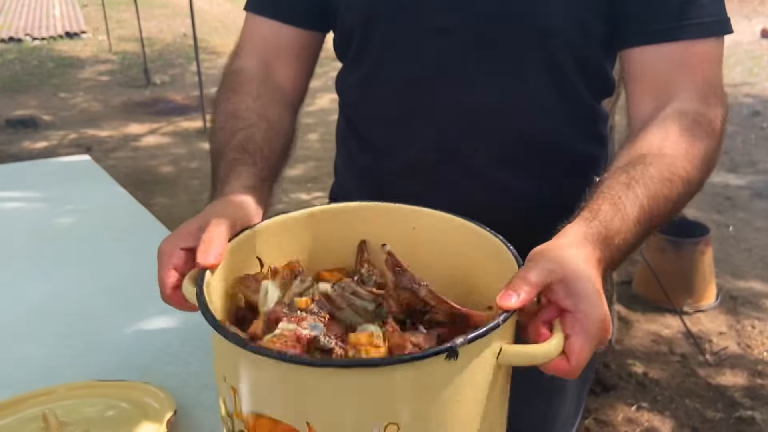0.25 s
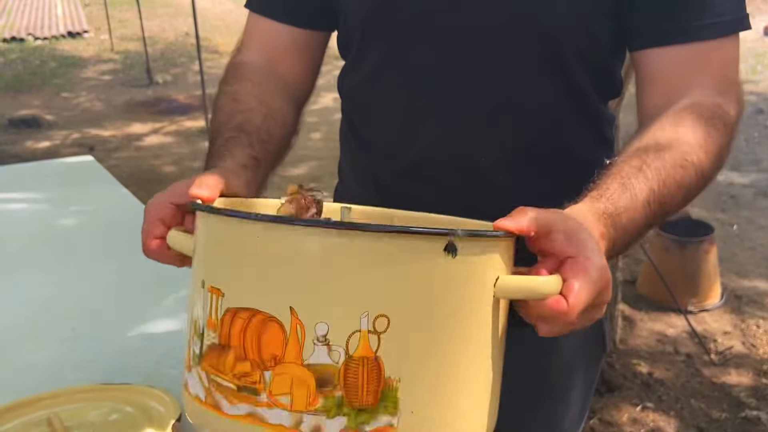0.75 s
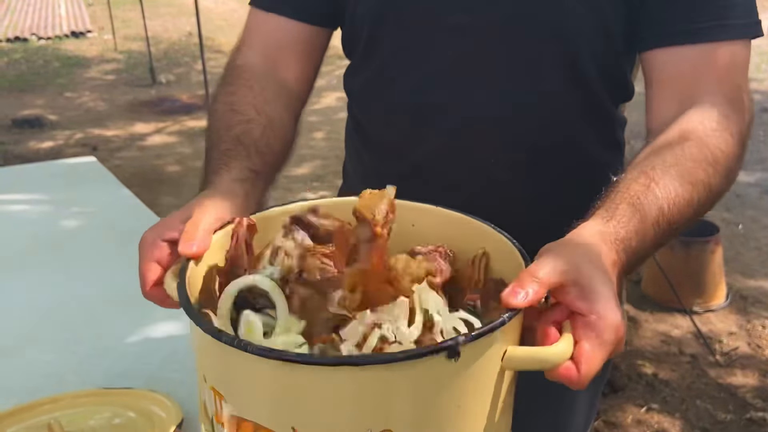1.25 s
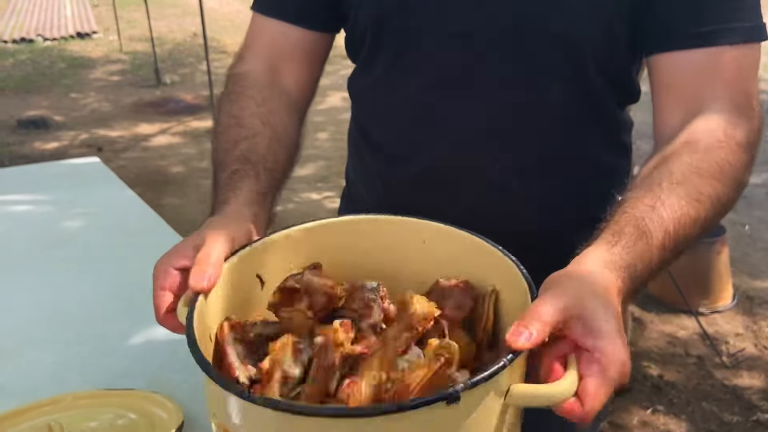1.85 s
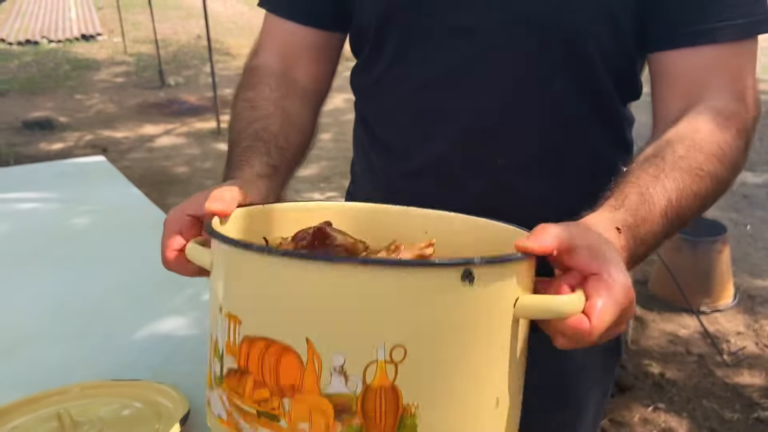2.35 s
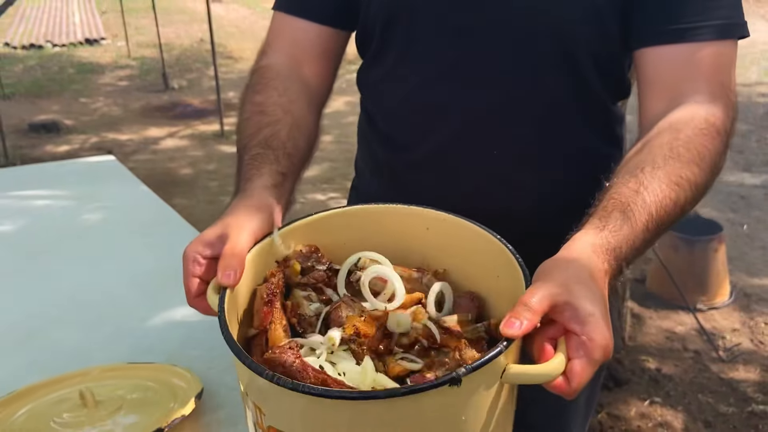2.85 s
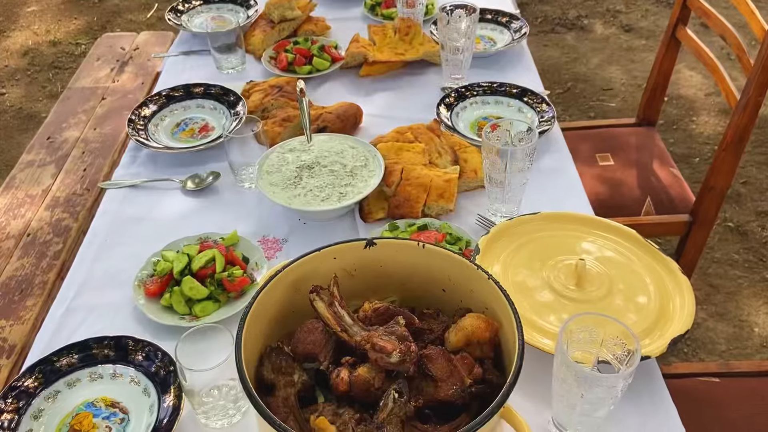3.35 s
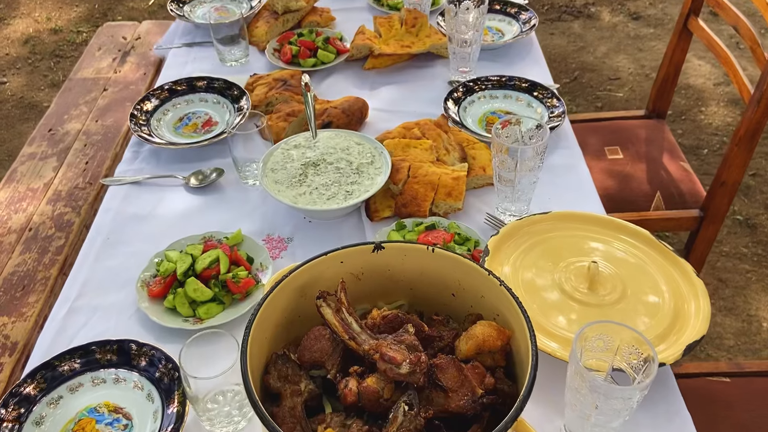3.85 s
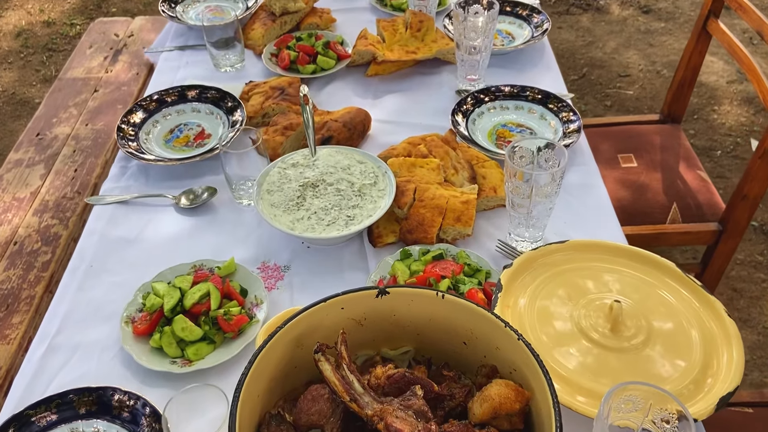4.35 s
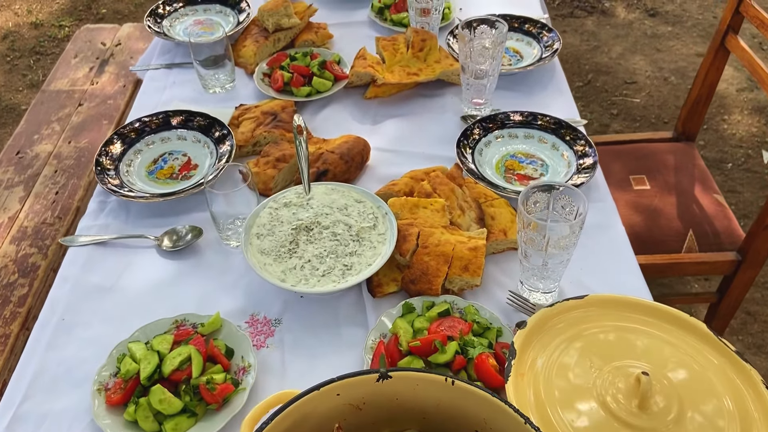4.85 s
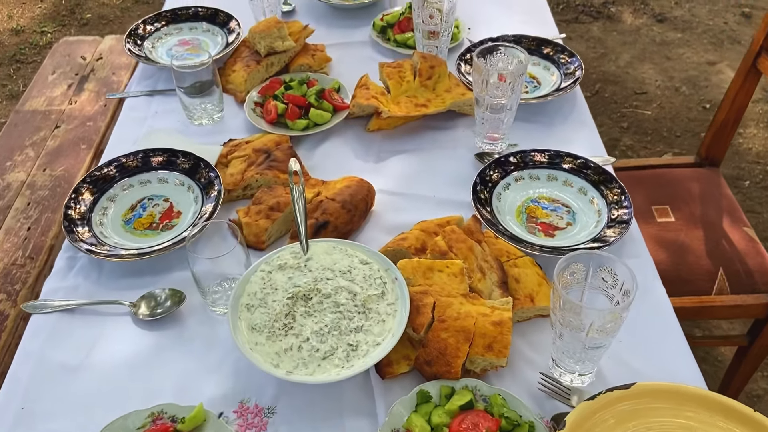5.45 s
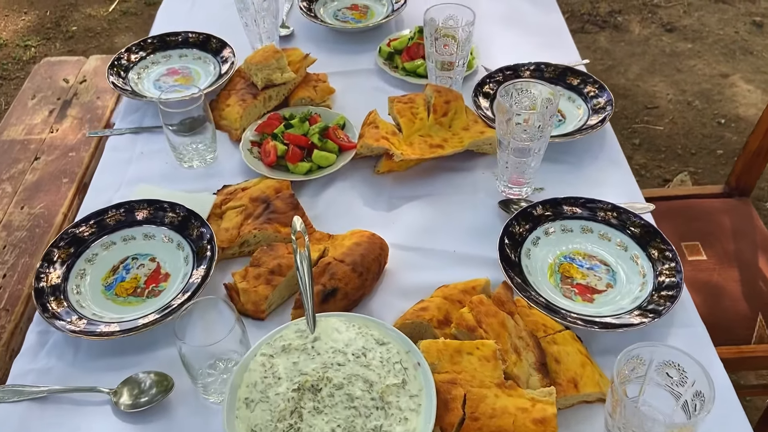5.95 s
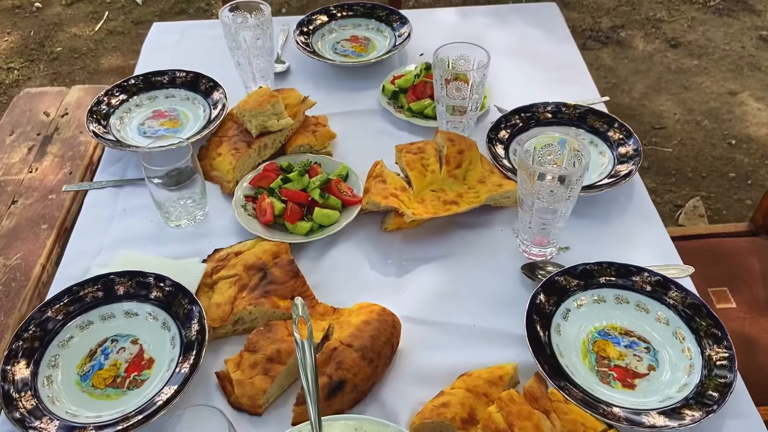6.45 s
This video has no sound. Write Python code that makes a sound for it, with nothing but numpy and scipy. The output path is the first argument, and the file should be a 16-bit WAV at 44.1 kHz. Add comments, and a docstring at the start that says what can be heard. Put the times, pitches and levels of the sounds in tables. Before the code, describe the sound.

From 0 to 3.16 s, close up, meat and onions are tossed in an enamel pot. Landings come at about 0.05, 0.5, 0.9, 1.3, 1.8, 2.15 and 2.6 s, the last loudest: soft heavy thuds, wet smacks, small pops and a damped hollow ring, with squelchy sliding around each. After 2.8 s it settles to near quiet, with small clicks. At 3.16 s it cuts hard to a quiet yard with a low bump on the microphone. A hen some way off clucks at 3.25 and 3.4 s, then gives a raspy, leaping squawk from 3.5 to 3.8 s. Dry clucks follow roughly every 0.2 s from 4.4 to 5.85 s, with fainter hens calling near 5.0 and 5.5 s, then another squawk at 5.95-6.2 s. Soft bumps, dirt scuffs, rustles, faint hiss and light wind puffs run beneath. A wild bird gives a clear rising whistle at 6.3 s and a warbled one at 6.65 s.

```python
"""Raw meat and onions thud and slap in an enamel pot close to the microphone in a yard, and ring its hollow.
The scene then changes abruptly to a quiet outdoor table: some way off a hen clucks and breaks into squawks,
a wild bird whistles, and soft bumps, scuffs, rustles and a little wind reach the microphone.
Blows and sprays of clicks excite the pot's resonances; pulses and air pass through the hen's throat;
the whistles are gliding tones, and the air, hiss and wind are coloured noise."""
import sys
import numpy as np
from scipy import signal
from scipy.fft import rfft, irfft, next_fast_len
from scipy.io import wavfile
from scipy.ndimage import uniform_filter1d

SR = 44100
rng = np.random.default_rng(int(sys.argv[2]) if len(sys.argv) > 2 else 0)


def wrap_up_sound(samples):
    """Save the sound to the file named by the first command line argument, as 16-bit audio."""
    columns = np.atleast_2d(samples).T
    # keep every value between -1 and 1, then stretch to whole-number steps
    tamed = np.clip(columns, -1, 1)
    steps = np.round(tamed * 32767).astype(np.int16)
    wavfile.write(sys.argv[1], SR, steps)


N = 295911
T = np.arange(N) / SR
HIT_T = T[:8192]  # time axis of one short sound
PORTS = np.array([[1], [-1]]) / 2  # left and right, half of any difference each


def amp(db):
    """Decibels to gain."""
    return 10 ** (np.asarray(db) / 20)


def unit(x):
    """Scale to rms 1."""
    return x / np.sqrt(np.mean(x ** 2))


def peak_unit(x, size=176):
    """Scale so that the loudest stretch of size samples has rms 1."""
    return x / np.sqrt(uniform_filter1d(np.atleast_2d(x) ** 2, size).mean(axis=0).max())


def add(out, s, x):
    """Mix x into out from time s on."""
    i = max(int(s * SR), 0)
    out[..., i:i + x.shape[-1]] += x[..., :max(N - i, 0)]


def at(points, f):
    """Read (Hz, value) points on a log-frequency axis."""
    hz, value = np.transpose(points)
    return np.interp(np.log(f + 1), np.log(hz), value)


def shape(x, response):
    """Filter by a gain given as a function of frequency."""
    n = next_fast_len(x.shape[-1] + 2048)
    return irfft(rfft(x, n) * response(np.fft.rfftfreq(n, 1 / SR)), n)[..., :x.shape[-1]]


def colour(x, points):
    """Filter by (Hz, dB) points."""
    return shape(x, lambda f: amp(at(points, f)))


def resonance(f, hz, width):
    """Response of one resonance, 1 at its centre."""
    return 1j * f * width / (hz ** 2 - f ** 2 + 1j * f * width)


def moving_band(x, hz, width, order=2):
    """A resonance whose centre may move: shift it down to 0 Hz, low-pass, shift back."""
    turn = np.exp(2j * np.pi * np.cumsum(hz * np.ones(len(x))) / SR)
    return 2 * np.real(turn * butter(x / turn, width / 2, "low", order=order))


def butter(x, hz, kind, order=2):
    """Causal low- or high-pass."""
    return signal.sosfilt(signal.butter(order, min(hz, SR / 2 - 1), kind, fs=SR, output="sos"), x)


def walk(rate, n=N):
    """Random wandering of spread near 1, with a new target rate times a second."""
    return np.interp(T[:n] * rate, np.arange(n), rng.standard_normal(n))


def bell(t, width):
    """A smooth swell, 1 at t = 0."""
    return np.exp(-(t / width) ** 2 / 2)


def widen(mid, side, side_db):
    """Left and right from a common and an opposed part."""
    return mid + amp(side_db) * side * np.array([[1], [-1]])


def crackle(n, rate, spread_db):
    """Random clicks of very unequal size, such as bursting films and bubbles of juice, or grit."""
    size = amp(spread_db * np.minimum(rng.exponential(size=n), 4))
    return (rng.random(n) < rate / SR) * size * rng.standard_normal(n)


# The close pot as the two microphone ports hear it.
# Each row: frequency in Hz, left minus right in dB.
PORT_BALANCE = [(60, -5), (110, 4.5), (200, -2), (380, -4.5), (700, -6), (1290, 0.5), (2380, 0.5),
                (4400, 2), (8120, -0.5), (15000, 0.5)]


def pot(lag_s=.000034):
    """All the sounds of the tossing; they reach the left port a moment before the right."""
    near = thuds() + slaps() + clicks() + slide()
    return shape(near, lambda f: amp(PORTS * at(PORT_BALANCE, f)) * np.exp(2j * np.pi * PORTS * f * lag_s))


# Heavy pieces landing in the pot.
# Each row: start in seconds, level in dB, hardness (top of the ring) in Hz, damping as a factor on mode widths.
THUDS = [(.014, -28, 856, 0.53), (.045, -37, 730, 0.28), (.45, -26, 886, 0.36), (.475, -18, 720, 0.84),
         (.53, -46.5, 650, 0.55), (.728, -51.5, 640, 0.32), (.882, -15, 744, 1), (.905, -33.5, 800, 0.76),
         (.932, -36.5, 630, 1.1), (1.263, -37.5, 1090, 0.11), (1.316, -31, 790, 0.39),
         (1.325, -38, 630, 0.64), (1.396, -40.5, 680, 1.2), (1.423, -34.5, 970, 1.5),
         (1.481, -35.5, 1030, 1.2), (1.769, -23, 946, 0.91), (1.981, -44.5, 1110, 0.23),
         (2.096, -34, 950, 0.37), (2.287, -38, 750, 0.75), (2.405, -53, 644, 0.29),
         (2.44, -46.5, 636, 0.18), (2.586, -8, 956, 0.66), (2.594, -18, 910, 1.06),
         (2.633, -13.5, 915, 1.6), (2.711, -44.5, 714, 0.81)]
FLESH_RATIO = .8  # the note of the flesh itself, as a share of a blow's hardness


def thuds(flesh_s=0.00092, flesh_db=-1, low_hz=430, shove_hz=150, shove_db=-36):
    """Soft heavy pieces push the air in the pot; the meat that covers the bottom damps the ring."""
    out = np.zeros(N)
    # the whole pot jolts
    shove = np.exp(-HIT_T / 0.022) * np.sin(2 * np.pi * shove_hz * HIT_T)
    for (s, db, hard_hz, damping), size in zip(THUDS, rng.standard_normal(len(THUDS))):
        flesh_hz = FLESH_RATIO * hard_hz * (1 + .04 * size)
        flesh = HIT_T ** 2 * np.exp(-HIT_T / flesh_s) * np.sin(2 * np.pi * flesh_hz * HIT_T)
        ring = butter(pot_modes(damping, LOAD_SHIFT * size / 2, count=7), hard_hz, "low")
        blow = butter(peak_unit(ring) + amp(flesh_db) * peak_unit(flesh), low_hz, "high", order=5)
        add(out, s, amp(db) * (peak_unit(blow) + amp(shove_db) * shove))
    return out


# Wet slaps and smacks in the pot.
# Each row: start in seconds, level in dB, brightest frequency in Hz, decay time in seconds.
SLAPS = [(.013, -24, 5350, 0.02), (.094, -38.5, 4030, 0.027), (0.151, -45.5, 4220, 0.0093),
         (0.453, -38, 2880, 0.06), (0.48, -33, 4000, 0.015), (0.545, -43.5, 3300, 0.018),
         (0.577, -40.5, 4440, 0.021), (0.616, -39, 3460, 0.016), (.799, -39, 2410, 0.017),
         (.847, -26.5, 5700, 0.019), (.907, -34, 4230, 0.04), (0.952, -29, 5030, 0.0048),
         (1.219, -34, 4030, 0.016), (1.275, -37, 4260, 0.016), (1.316, -37, 6840, 0.015),
         (1.339, -22.5, 3130, 0.016), (1.564, -36, 3170, 0.031), (1.648, -39, 6100, 0.0093),
         (1.694, -41, 3870, 0.023), (1.709, -31.5, 6500, 0.023), (1.746, -26.5, 8200, 0.0038),
         (1.764, -27, 7200, 0.0041), (1.773, -17.5, 3430, 0.01), (1.981, -43.5, 2820, 0.0052),
         (2.094, -31, 5360, 0.0092), (2.121, -36, 3880, 0.03), (2.275, -39.5, 8630, 0.005),
         (2.467, -38, 3670, 0.023), (2.531, -38.5, 2480, 0.029), (2.566, -33, 5600, 0.035),
         (2.585, -17, 3140, 0.0099), (2.631, -30.5, 2013, 0.014), (2.685, -39.5, 6500, 0.015),
         (2.734, -40.5, 5100, 0.02), (2.787, -46, 2980, 0.0076), (2.801, -46.5, 2400, 0.0076),
         (3.142, -38.5, 3220, 0.0079)]


def slaps(contact_db=4, contact_s=.002):
    """Wet surfaces meet with a smack and a quickly fading spray of clicks, among them small popping notes."""
    out = np.zeros((2, N))
    for s, db, hz, decay in SLAPS:
        fading = np.exp(-HIT_T / decay) + amp(contact_db) * np.exp(-HIT_T / contact_s)
        spray = crackle(len(HIT_T), rate=7700, spread_db=2.0) * fading
        spray = peak_unit(shape(spray, lambda f: resonance(f, hz, 1.2 * hz)))
        # small pockets of air and juice pop, each with its own short rising note
        for delay, pitch, size in rng.random((7, 3)):
            age = np.maximum(HIT_T - 3 * decay * delay, 0)
            cycles = hz * (.4 + pitch) * age * (1 + 10 * np.minimum(age, .02))
            pop = np.exp(-2 * delay - cycles / 14) * np.sin(2 * np.pi * cycles)
            spray = spray + .9 * size * pop
        add(out, s, amp(db) * peak_unit(in_pot(spray)))
    return out


# Dry clicks among the pot sounds, some with a slap, the last at the scene cut.
# Each row: start in seconds, level in dB, brightest frequency in Hz.
CLICKS = [(.670, -44, 6000), (1.746, -21.5, 7050), (2.074, -45, 6000), (2.5847, -18, 3170),
          (2.927, -42, 6550), (3.158, -28, 1480)]


def clicks():
    """Each dry click is one impulse through a broad resonance."""
    out = np.zeros((2, N))
    for s, db, hz in CLICKS:
        click = shape(1. * (HIT_T == 0), lambda f: resonance(f, hz, 0.69 * hz))
        add(out, s, amp(db) * peak_unit(click))
    return out


def slide(rub_db=-9, heave_db=-16, juice_db=-8, juice_hz=1900, smack_db=-1, smack_s=0.012,
          patchy_db=3.0, rub_patchy_db=6, rub_damping=2.8, piece_hz=3500, count=5):
    """Pieces squelch in their own colours and murmur in the pot's first modes; the load heaves with a rumble."""
    wet = rub = 0
    for place in np.linspace(-1, 1, count):
        squelch = crackle(N, rate=900, spread_db=3.4) * amp(patchy_db * walk(35))
        # small smacks at random moments
        contacts = 1. * (rng.random(N) < 9 / SR)
        contacts = signal.lfilter([1], [1, -np.exp(-1 / (smack_s * SR))], contacts)
        squelch = squelch * (1 + amp(smack_db) * unit(contacts))
        hz = piece_hz * 2 ** place
        wet = wet + unit(in_pot(shape(squelch, lambda f: resonance(f, hz, 1.6 * hz))))
        drag = crackle(N, rate=60, spread_db=2) * amp(rub_patchy_db * walk(14))
        murmur = pot_modes(rub_damping, LOAD_SHIFT * place, count=2)
        rub = rub + unit(signal.fftconvolve(drag, murmur)[:N])
    heave = colour(rng.standard_normal(N), [(25, -18.0), (60, -7), (170, -3), (300, -7.5), (900, -52.5)])
    juice = crackle(N, rate=1200, spread_db=3.2) * amp(5 * walk(45))
    juice = in_pot(shape(juice, lambda f: resonance(f, juice_hz, juice_hz) ** 2))
    load = unit(wet) + amp(juice_db) * unit(juice) + amp(rub_db) * unit(rub) + amp(heave_db) * unit(heave)
    return load * sliding()


# Tosses, at the moment the load comes down.
# Each row: landing in seconds, level of the sliding meat in dB.
TOSSES = [(.04, -47.5), (0.492, -52.5), (0.891, -48.5), (1.319, -47.5), (1.78, -48), (2.151, -44),
          (2.63, -44.5)]
GATHER_S, SETTLE_S = 0.099, 0.099  # the sliding swells before a landing and dies away after it
SHIFT_DB, HELD_DB, HELD_S = -64.5, -65.5, 2.8  # the meat shifts between tosses, less once the pot is held still


def sliding():
    """How strongly the meat slides: it gathers before each landing, settles after it and rests at the end."""
    swells = sum(amp(db) * np.exp(-np.maximum((s - T) / GATHER_S, (T - s) / SETTLE_S)) for s, db in TOSSES)
    return np.where(T < HELD_S, np.hypot(swells, amp(SHIFT_DB)), amp(HELD_DB))


# Air and wall resonances of the pot.
# Each row: centre in Hz, width in Hz before damping, level in dB before weighting by width.
POT_RESONANCES = [(549, 45, 0), (807, 42, -9), (1240, 38, -12), (1650, 56, -16), (2060, 38, -21),
                  (2330, 100, -16), (2610, 110, -17), (3170, 130, -16), (3700, 59, -15), (4120, 170, -23),
                  (4620, 37, -20), (5300, 45, -21), (6000, 230, -22), (6470, 40, -22), (7150, 170, -25)]
AIR_MODES, LOAD_SHIFT = 4, .03  # the lowest modes are the pot's air: their shift scales with this share


def pot_modes(damping, shift=0, count=30):
    """The pot's ring after one push: the load shifts its air modes; neighbouring modes start opposed."""
    ring = 0
    for k, (hz, width, db) in enumerate(POT_RESONANCES[:count]):
        decay = np.exp(-np.pi * width * damping * HIT_T)
        mode_hz = hz * (1 + shift * (k < AIR_MODES))
        ring = ring + (-1) ** k * amp(db) * width * decay * np.sin(2 * np.pi * mode_hz * HIT_T)
    return ring


# Tone of the wet sounds.
# Each row: frequency in Hz, gain in dB.
WET_COLOUR = [(200, 2.5), (500, -3), (1000, 3), (2000, -0.5), (4000, -3.5), (7000, 0), (11000, -2),
              (16000, -7.5)]


def in_pot(x, scatter_db=0, scatter_s=0.007, direct=0.31, side_db=-3):
    """A wet sound inside the pot: heard directly, through the modes and scattered between the walls."""
    scatter = rng.standard_normal((2, len(HIT_T))) * np.exp(-HIT_T / scatter_s)
    modes = pot_modes(0.82, LOAD_SHIFT * rng.standard_normal())
    response = unit(modes) + amp(scatter_db) * unit(widen(*scatter, side_db))
    response = response / np.sqrt(len(HIT_T))
    response[:, 0] += direct
    return colour(signal.fftconvolve(x[None], response, axes=1)[:, :len(x)], WET_COLOUR)


CLUCK_ECHO_DB, SQUAWK_ECHO_DB, YARD_T60_S = -4, -4, .34  # echo levels and the yard's main decay


def hen():
    """Dry little clucks, long squawks and the calls of hens farther off, all carrying round the yard."""
    calls = squawks() + far_calls()
    return yard(clucks(), CLUCK_ECHO_DB, YARD_T60_S) + yard(calls, SQUAWK_ECHO_DB, YARD_T60_S)


# A squawk opens with a rasp, leaps to a held note and falls back into a rasping tail; one curve for each.
# Each row: time in seconds, level in dB, pitch in Hz, roughness 0-1, upper resonance in Hz and its level in dB,
# beak opening in dB, level of the second tone in dB.
SQUAWKS = [
    [(3.498, -60, 608.6, 0.93, 2800, -6, 10, -80), (3.528, -40, 606.3, 0.9, 2920, -3.5, 4, -59),
     (3.56, -43.5, 579.7, 0.73, 2750, -9, -2, -33), (3.592, -45, 584.3, 0.54, 2670, -7, 2.5, -36),
     (3.607, -42.5, 672.6, 0.12, 2900, -17, -2, -39.5), (3.745, -46.5, 662, 0.07, 3090, -12, -2.5, -56),
     (3.768, -44.5, 626.5, 0.82, 2850, -6.5, -1.5, -58), (3.805, -46, 542, 0.69, 2630, -11, -2.5, -44),
     (3.835, -64, 530, .8, 2600, -12, 0, -70)],
    [(5.932, -68, 624.6, 0.64, 3860, -14, -4, -70), (5.955, -48, 600.7, .7, 3740, -8, 3, -53),
     (5.99, -52, 570.4, 0.43, 3450, -6, 6, -38), (6.022, -45.5, 642, 0.78, 2744, -4.5, 4, -60),
     (6.08, -46.5, 670.6, 0.38, 2890, -9, 6, -56), (6.168, -44.5, 630.6, 0.68, 2686, -3, 7, -60),
     (6.225, -59, 582.4, 0.92, 2700, -3, -2, -77)],
]
MOUTH_HZ = 1246  # the throat's main resonance in a squawk
SECOND_TOP_HZ = 1168  # the syrinx's other side sings at twice the pitch, but no higher than this


def squawks():
    """The hen's long calls, each along its own curve."""
    out = np.zeros(N)
    for curve in SQUAWKS:
        add(out, curve[0][0], squawk(curve))
    return out


def squawk(curve):
    """One long call: both sides of the syrinx follow the hen's effort."""
    times, *columns = np.transpose(curve)
    t = np.arange(times[0], times[-1], 1 / SR)
    db, hz, rough, upper_hz, upper_db, beak_db, second_db = (np.interp(t, times, c) for c in columns)
    voice = hen_voice(hz, rough, MOUTH_HZ, upper_hz, upper_db, beak_db)
    second = tone(np.minimum(2 * hz, SECOND_TOP_HZ), waver=0.0051, overtone_db=-36.0)
    return amp(db) * voice + amp(second_db) * second


# The throat's lesser resonances, let out by the open beak.
# Each row: centre in Hz, width in Hz, level in dB.
THROAT = [(2070, 670, -11.5), (4070, 650, -15.5), (4680, 570, -23.5), (6330, 1130, -23),
          (7500, 1270, -23.5), (11050, 2600, -22.5)]
MOUTH_WIDTH_HZ, UPPER_WIDTH_HZ = 380, 685  # the main resonance and the moving upper one
HALF_PITCH = 0.78  # share of the half pitch per unit of roughness
SQUAWK_LOW_HZ = 890  # the throat passes little below this


def hen_voice(hz, rough, mouth_hz, upper_hz, upper_db, beak_db, jitter=0.05, count=40):
    """Uneven syrinx pulses, alternately strong and weak, pass the throat with rasping air; levelled near rms 1."""
    n, half = len(hz), np.minimum(HALF_PITCH * rough, 1)
    # a hoarse voice also wanders more in pitch
    quaver = (.004 + .04 * rough) * walk(40, n)
    phase = 2 * np.pi * np.cumsum(hz * (1 + quaver + jitter * rough * walk(350, n))) / SR
    # the membranes never close twice alike, so each overtone swells and fades on its own
    pulses = sum(np.cos(k * phase / 2) * (half if k % 2 else 1) * amp(3.5 * walk(40, n))
                 for k in range(2, count))
    rasp = rng.standard_normal(n) * (1 + np.cos(phase)) * amp(4 * walk(160, n))
    source = butter(unit(pulses), 5500, "low")
    source = source + (.16 + .45 * rough) * butter(rasp, 7000, "low", order=1)
    mouth = moving_band(source, mouth_hz, MOUTH_WIDTH_HZ)
    upper = moving_band(source, upper_hz, UPPER_WIDTH_HZ, order=3)
    voice = butter(mouth + amp(upper_db) * upper, SQUAWK_LOW_HZ, "high", order=3)
    voice = voice + amp(beak_db) * through_throat(source, THROAT, 0, SQUAWK_LOW_HZ)
    flutter = amp(3.5 * rough * walk(110, n))
    return flutter * voice / np.sqrt(uniform_filter1d(voice ** 2, size=500) + 1e-12)


def through_throat(source, throat, open_db, low_hz):
    """The throat's resonances shape the voice; an open beak lets the upper ones out."""
    voice = shape(source, lambda f: sum(amp(db) * abs(resonance(f, centre, width)) ** 4
                                        for centre, width, db in throat))
    voice = butter(voice, low_hz, "high", order=4)
    return voice + (amp(open_db) - 1) * shape(voice, lambda f: 1 - 1 / (1 + (f / 1650) ** 12))


# Short clucks some way from the microphone.
# Each row: centre in seconds, level in dB before cluck_db, highest mean pitch in Hz,
# beak opening in dB before cluck_open_db and the swing.
CLUCKS = [(3.245, -51, 351.4, -11), (3.424, -53, 342.5, -2), (4.365, -63.5, 291, -4.5),
          (4.565, -57, 281, -3), (4.754, -59.5, 271.4, -6), (4.937, -58.5, 262.4, -6),
          (5.12, -61, 250.7, -18), (5.311, -60, 260, -2.5), (5.488, -58, 280, -3.5),
          (5.664, -56.5, 292.4, -2.5), (5.848, -55, 338.4, -1.5), (6.712, -57.5, 342, -16)]
# The throat in a cluck. Each row: centre in Hz, width in Hz, level in dB.
CLUCK_THROAT = [(1130, 630, 6.5), (2200, 430, -1.5), (2980, 550, -5), (4300, 1700, -17),
                (7000, 1520, -25.5), (10840, 2300, -27.5)]
CLUCK_LOW_HZ = 800  # the throat passes little below this
CLUCK_RISE_S, CLUCK_FALL_S, CLUCK_ARCH = 0.011, 0.018, 0.35  # the push of air, and the pitch share following it
CLUCK_PULSE_S, CLUCK_AIR_DB = .0007, -12  # length and level of the puff of air with each pulse


def clucks(cluck_db=3, cluck_open_db=1, beak_swing_db=10):
    """A short push of air rattles the syrinx in ragged puffs; their rate and the beak follow the push."""
    out = np.zeros(N)
    t = T[:4410] - T[2205]
    push = bell(t, np.where(t < 0, CLUCK_RISE_S, CLUCK_FALL_S))
    for s, db, hz, open_db in CLUCKS:
        rate = hz * (1 + CLUCK_ARCH * (push - 1)) * np.exp(.13 * walk(300, len(t)))
        turns = np.cumsum(rate) / SR
        pulses = np.diff(np.floor(turns), prepend=0) * amp(3 * walk(200, len(t)))
        puffs = np.exp(-(turns % 1) / rate / CLUCK_PULSE_S) * rng.standard_normal(len(t))
        source = unit(pulses) + amp(CLUCK_AIR_DB) * unit(puffs)
        beak_db = cluck_open_db + open_db - beak_swing_db * (1 - push)
        voice = through_throat(source, CLUCK_THROAT, beak_db, CLUCK_LOW_HZ)
        add(out, s + t[0], amp(db + cluck_db) * peak_unit(push * voice, size=880))
    return out


# Hens farther off.
# Each row: start in seconds, length in seconds, level in dB, start pitch in Hz, end pitch in Hz, roughness 0-1,
# main resonance in Hz, upper resonance in Hz, level of the upper one in dB.
FAR_CALLS = [(5.01, .235, -59, 1250, 1085, .35, 1200, 3700, -11),
             (4.99, 0.27, -65, 722, 705, .35, 1500, 2190, -5),
             (5.515, 0.089, -59, 592, 575, .4, 1820, 3400, -7),
             (5.775, 0.076, -62.5, 570, 560, .7, 2030, 3200, -8)]


def far_calls():
    """The calls of the farther hens."""
    out = np.zeros(N)
    for s, *call in FAR_CALLS:
        add(out, s, far_call(*call))
    return out


def far_call(length, db, start_hz, end_hz, *throat, fade_s=.03):
    """A soft drawn-out call on one slow glide."""
    t = np.arange(0, length, 1 / SR)
    gate = np.minimum(np.minimum(t, t[-1] - t) / fade_s, 1)
    return gate * amp(db) * hen_voice(np.linspace(start_hz, end_hz, len(t)), *throat, beak_db=3)


# A wild bird's rising whistles.
# Each row: start in seconds, length in seconds, level in dB before the fade and tail, start pitch in Hz,
# top pitch in Hz, warble as a share of the pitch.
WHISTLES = [(6.284, .21, -57.5, 1943, 2715, .008), (6.499, 0.093, -71, 2670, 2740, 0.0094),
            (6.636, 0.097, -57.5, 1950, 2020, 0.12)]
WHISTLE_RISE_S, WHISTLE_FADE_DB_PER_S, WARBLE_HZ = 0.047, 37, 56.5
WHISTLE_ATTACK_S, WHISTLE_HOLD_S, WHISTLE_TAIL_DB = .022, .118, -10  # a long whistle sinks to a softer tail


def wild_bird():
    """Each whistle climbs to its top note and trails off, with a slight or strong warble."""
    out = np.zeros(N)
    for s, length, db, start_hz, top_hz, warble in WHISTLES:
        t = np.arange(0, length, 1 / SR)
        hz = top_hz + (start_hz - top_hz) * np.exp(-(t / WHISTLE_RISE_S) ** 2)
        hz = hz * (1 + warble * np.cos(2 * np.pi * WARBLE_HZ * t))
        gate = np.minimum(np.minimum(t, t[-1] - t) / WHISTLE_ATTACK_S, 1)
        tail_db = WHISTLE_TAIL_DB * (1 + np.tanh((t - WHISTLE_HOLD_S) / WHISTLE_ATTACK_S)) / 2
        level = gate * amp(db + tail_db - WHISTLE_FADE_DB_PER_S * t)
        add(out, s, level * tone(hz, waver=.008, overtone_db=-40))
    return out


def tone(hz, waver, overtone_db):
    """A nearly pure, slightly unsteady bird tone; rms near 1."""
    phase = 2 * np.pi * np.cumsum(hz * (1 + waver * walk(189.4, len(hz)))) / SR
    return np.sqrt(2) * (np.sin(phase) + amp(overtone_db) * np.sin(2 * phase))


LATE_ECHO_DB, LATE_T60_S = -23, 0.92  # the yard's faint tail, relative to its first echoes


def yard(x, echo_db, t60, side_db=-4):
    """Walls and trees return scattered echoes that die away fast."""
    t = T[:SR]
    echoes = np.array([crackle(SR, rate=1000, spread_db=2) for _ in range(2)])
    decay = amp(-60 * t / t60) + amp(LATE_ECHO_DB - 60 * t / LATE_T60_S)
    echoes = echoes * decay * (t > .008)
    response = unit(widen(*echoes, side_db)) / np.sqrt(SR)
    return x + amp(echo_db) * signal.fftconvolve(x[None], response, axes=1)[:, :N]


# Soft bumps on the microphone, each falling in pitch.
# Each row: start in seconds, peak of the swell in dB, start pitch in Hz, end pitch in Hz, time to the peak in s.
BUMPS = [(3.191, -32.5, 604, 201, 0.00074), (3.196, -29.5, 142, 51.7, 0.0067),
         (4.367, -47, 108.4, 54.6, 0.013), (4.516, -39, 660, 185, 0.0008),
         (4.527, -38.5, 715, 178, 0.00082), (4.933, -52.5, 620, 152, 0.0077),
         (5.031, -41, 652, 181, 0.00079), (5.398, -46.5, 623, 119.5, 0.00095),
         (5.454, -48, 110, 54.8, 0.0087), (5.610, -54, 219.4, 58.4, 0.0063),
         (6.49, -44, 232.6, 70.5, 0.0032)]


def bumps():
    """Each bump is a short swelling thump that sinks in pitch."""
    out = np.zeros(N)
    for s, db, start_hz, end_hz, length in BUMPS:
        age = HIT_T / length
        hz = end_hz + (start_hz - end_hz) * np.exp(-age / 2)
        add(out, s, amp(db) * age * np.exp(1 - age) * np.sin(2 * np.pi * np.cumsum(hz) / SR))
    return out


# Shoes scuffing the dirt.
# Each row: centre in seconds, level in dB, brightest frequency in Hz, bell width (sigma) in seconds.
SCUFFS = [(3.318, -64.5, 3340, 0.033), (3.684, -52.5, 396, 0.022), (4.02, -65.5, 3200, 0.028),
          (4.274, -71, 2090, 0.02), (4.335, -67, 196, 0.11), (4.624, -67, 4300, 0.038),
          (6.556, -71, 3400, 0.011)]


def scuffs():
    """Shoes grind many small grains of dirt in a brief swell."""
    out = np.zeros(N)
    t = HIT_T - HIT_T.mean()
    for s, db, hz, width in SCUFFS:
        grains = crackle(len(t), rate=3000, spread_db=1.5)
        grit = shape(grains, lambda f: resonance(f, hz, 2.3 * hz) ** 2)
        grit = butter(grit, 7800, "low", order=3)
        add(out, s + t[0], amp(db) * unit(grit) * bell(t, width))
    return out


def far_yard(rustle_db=-81, rustle_hz=2600, flock_db=-77, flock_hz=1250):
    """Dry litter rustles in patches, and the rest of the flock mutters far away."""
    grains = crackle(N, rate=900, spread_db=2) * amp(6 * walk(9))
    rustle = shape(grains, lambda f: resonance(f, rustle_hz, rustle_hz) ** 3)
    mutter = moving_band(rng.standard_normal(N), flock_hz * (1 + .15 * walk(7)), 90) * amp(6 * walk(12))
    return yard(amp(rustle_db) * unit(rustle) + amp(flock_db) * unit(mutter), echo_db=-6, t60=YARD_T60_S)


# Puffs of wind on the microphone.
# Each row: centre in seconds, level in dB.
GUSTS = [(3.22, -61), (4.03, -61), (4.35, -52.5), (4.551, -58.5), (4.88, -65), (5.028, -63), (5.62, -57.5),
         (6.22, -60.5), (6.518, -64.5)]
# Tone of the wind. Each row: frequency in Hz, gain in dB.
WIND_COLOUR = [(20, -83), (50, 13.5), (100, 0), (200, -7.5), (500, -22.5), (2000, -53)]
GUST_S, BREEZE_DB = 0.056, -67  # half-width (sigma) of a puff; the breeze between them


def wind():
    """A light breeze with short puffs rumbles on the microphone."""
    strength = amp(BREEZE_DB) + sum(amp(db) * bell(T - s, GUST_S) for s, db in GUSTS)
    return strength * wavering_noise(WIND_COLOUR, 0, side_db=-9.5, flicker_db=3.5)


# Still air by the pot.
# Each row: frequency in Hz, relative gain in dB.
POT_AIR = [(30, -11.5), (100, -3.5), (320, -12.5), (520, -10), (1000, -22), (3000, -5), (7500, -9.5),
           (11000, -0.5), (16000, -22.5)]


def pot_air():
    """The faint air around the pot: coloured noise, nearly the same at both ports."""
    return wavering_noise(POT_AIR, -65, side_db=-15.5)


# Faint hiss by the table, with two narrow gaps in its treble left by audio coding.
# Each row: frequency in Hz, relative gain in dB.
TABLE_HISS = [(88, -45), (150, -4), (578, -4.5), (1310, -12), (1560, -11.5), (2270, -11), (7320, -24.5),
              (8730, -40.5), (11300, -21), (12900, -60.5), (16000, -55)]


def table_hiss():
    """The faint hiss by the table: coloured noise with two gaps in its treble, wide between the ports."""
    return wavering_noise(TABLE_HISS, -66.5, side_db=0.0, flicker_db=3.0)


def wavering_noise(points, db, side_db, flicker_db=5.0):
    """Coloured noise whose lows, middle and highs waver each on their own."""
    noise = unit(colour(widen(*rng.standard_normal((2, N)), side_db), points))
    low = shape(noise, lambda f: 1 / (1 + (f / 400) ** 4))
    high = shape(noise, lambda f: 1 - 1 / (1 + (f / 2000) ** 4))
    bands = low, noise - low - high, high
    return sum(band * amp(db + flicker_db * walk(7.0)) for band in bands)


CHANGE_S = 3.162  # the pot gives way to the table
HEN_PAN_DB = -2  # left minus right


def scene():
    """First the pot, then the table with the birds around it."""
    by_pot = pot() + pot_air()
    birds = hen() * amp(PORTS * HEN_PAN_DB)
    birds = birds + yard(wild_bird(), echo_db=-1.5, t60=0.39)
    by_table = birds + far_yard() + bumps() + scuffs() + wind() + table_hiss()
    return np.where(T < CHANGE_S, by_pot, by_table)


def record(dry, top_hz=16200):
    """The recorder cuts the top with a steep low-pass."""
    return signal.sosfilt(signal.ellip(8, .2, 70, top_hz, fs=SR, output="sos"), dry)


dry = scene()
out = record(dry)
wrap_up_sound(out)
```